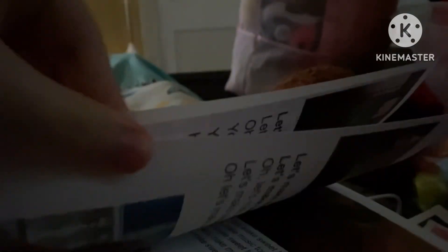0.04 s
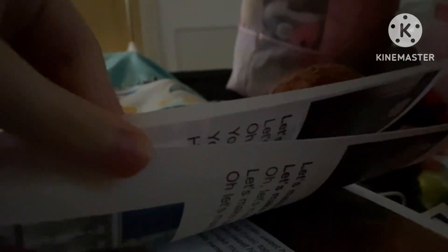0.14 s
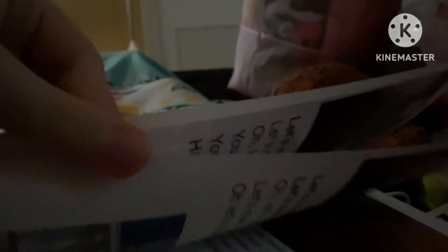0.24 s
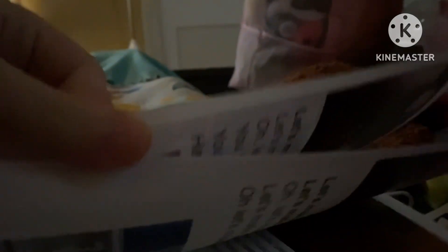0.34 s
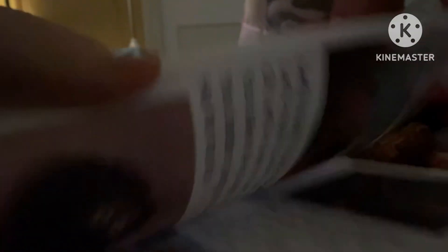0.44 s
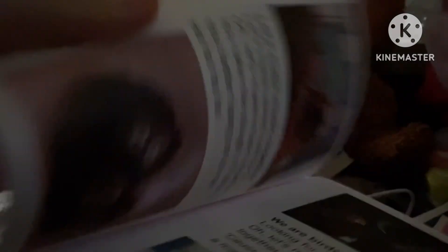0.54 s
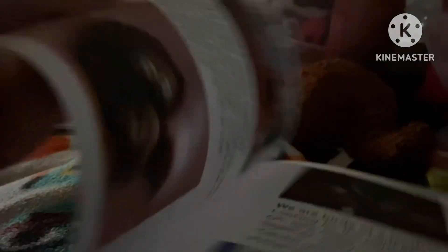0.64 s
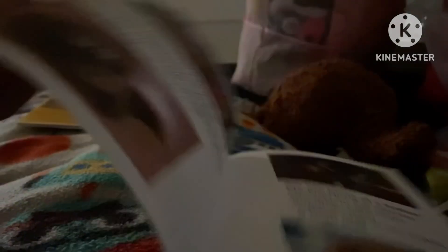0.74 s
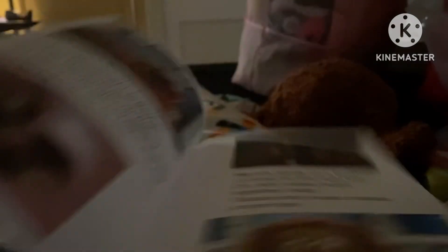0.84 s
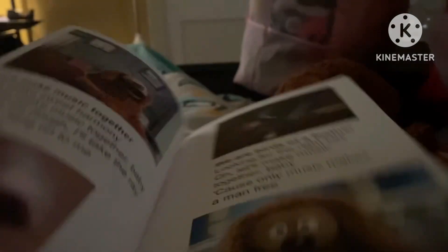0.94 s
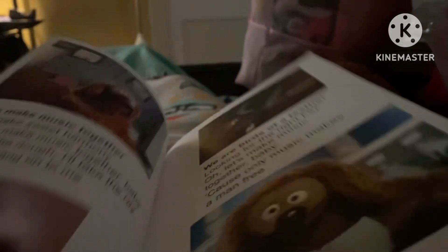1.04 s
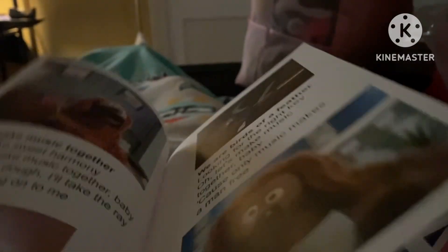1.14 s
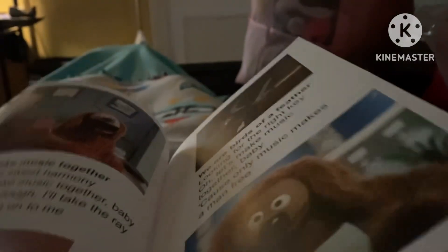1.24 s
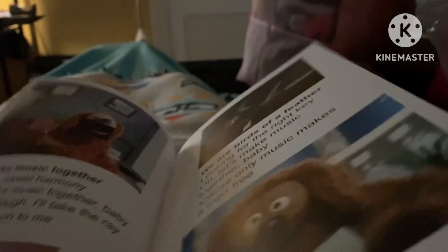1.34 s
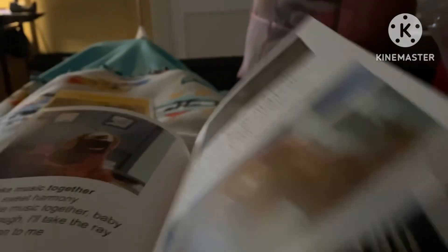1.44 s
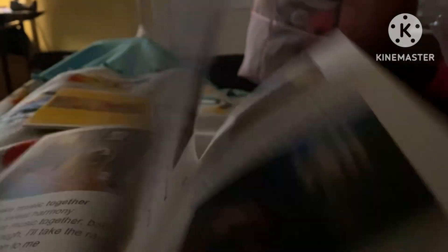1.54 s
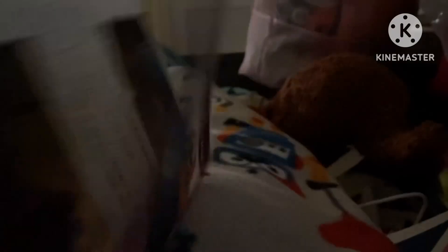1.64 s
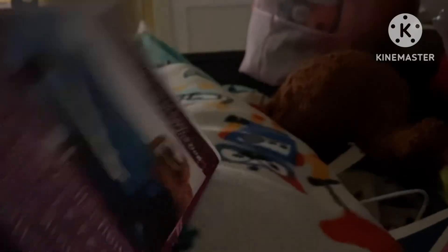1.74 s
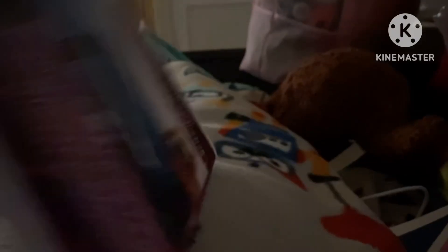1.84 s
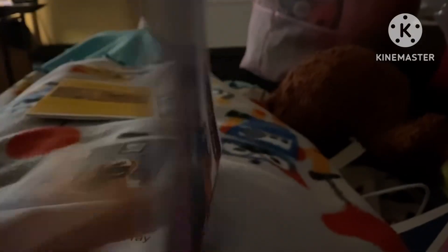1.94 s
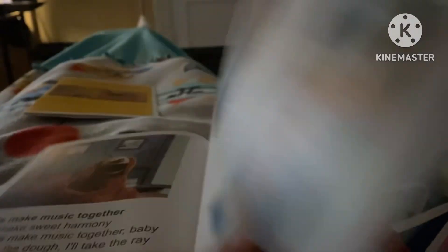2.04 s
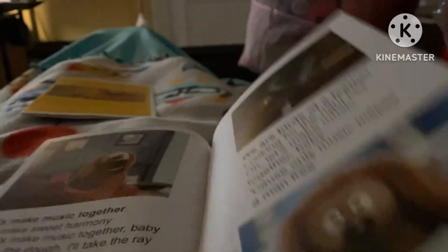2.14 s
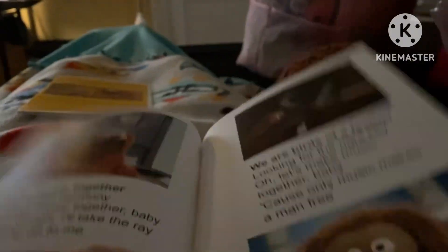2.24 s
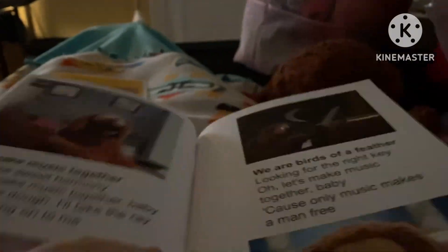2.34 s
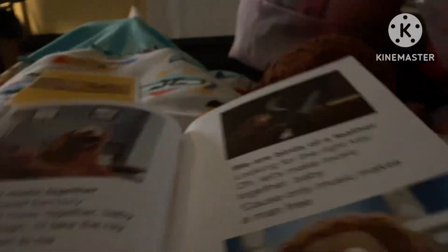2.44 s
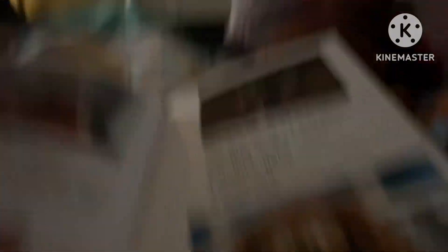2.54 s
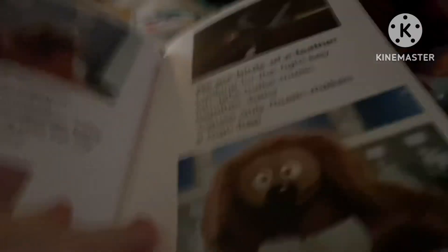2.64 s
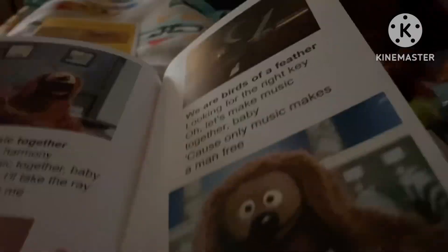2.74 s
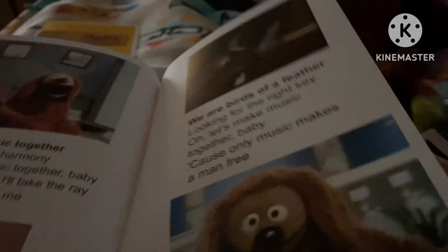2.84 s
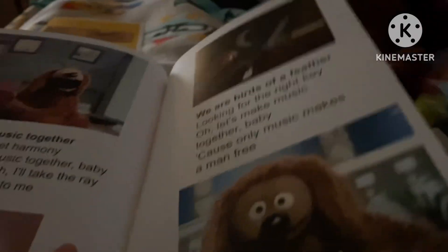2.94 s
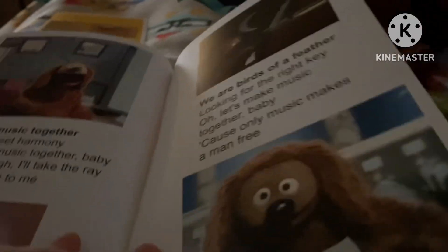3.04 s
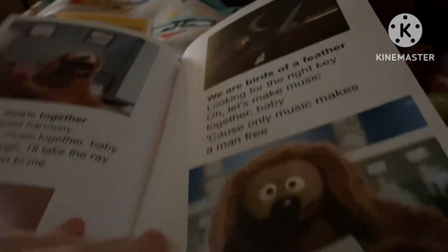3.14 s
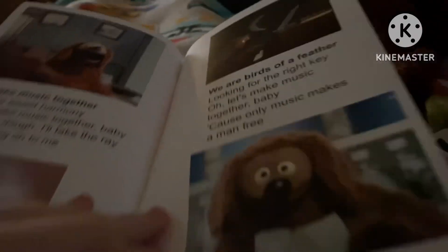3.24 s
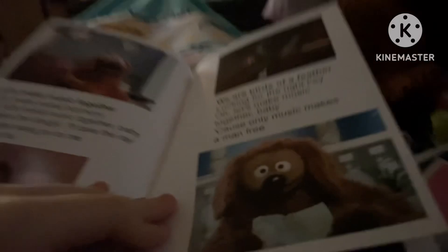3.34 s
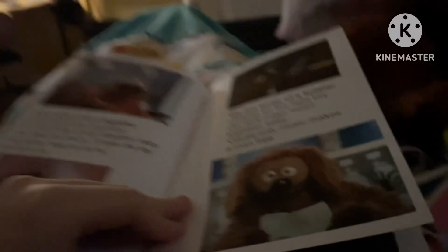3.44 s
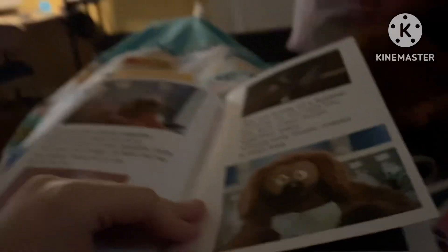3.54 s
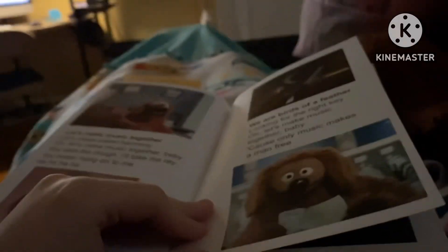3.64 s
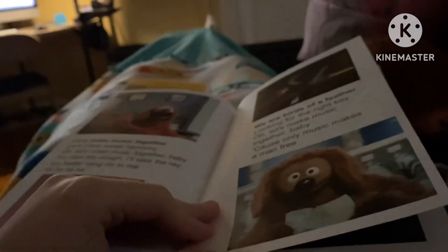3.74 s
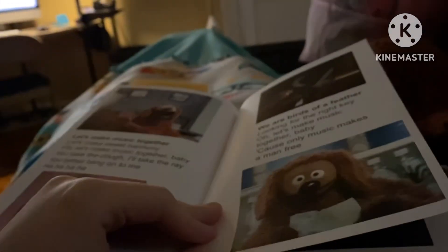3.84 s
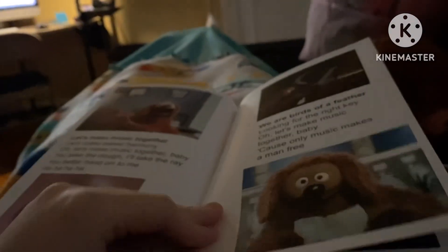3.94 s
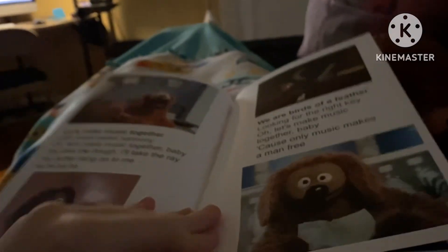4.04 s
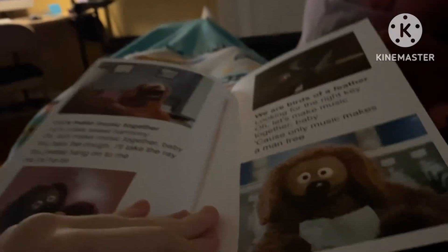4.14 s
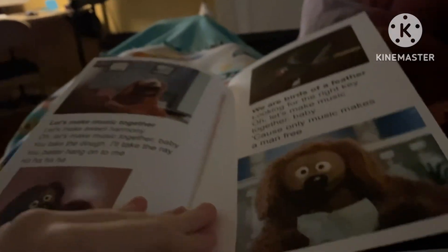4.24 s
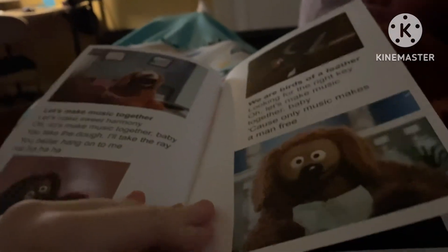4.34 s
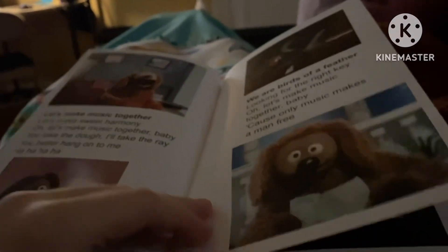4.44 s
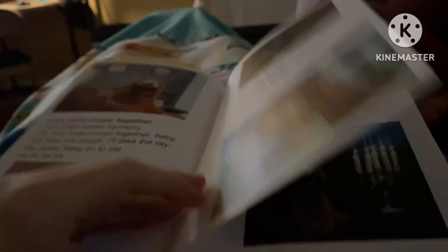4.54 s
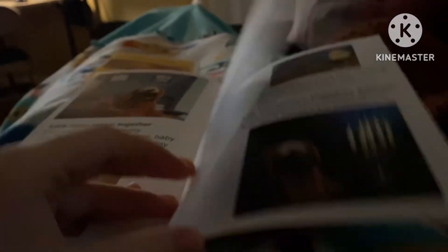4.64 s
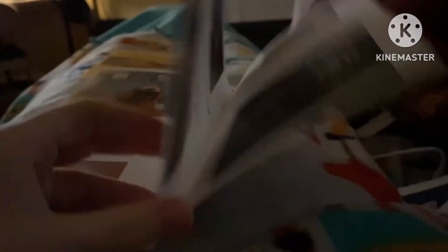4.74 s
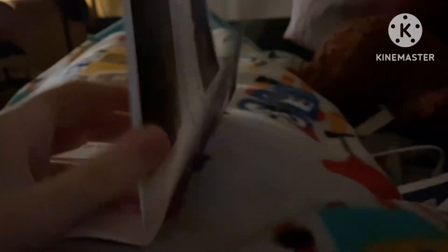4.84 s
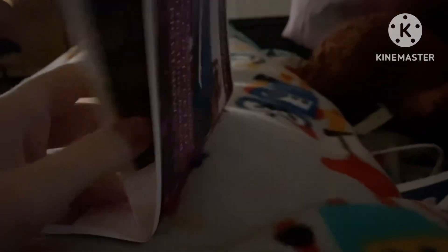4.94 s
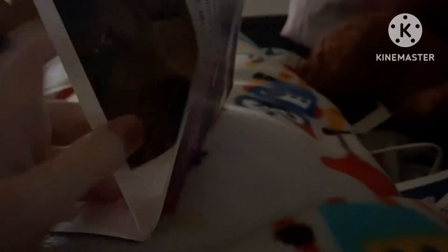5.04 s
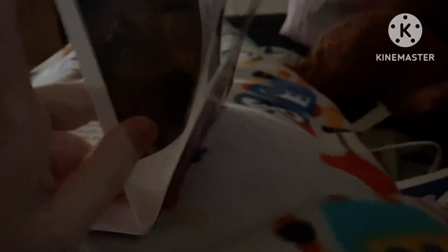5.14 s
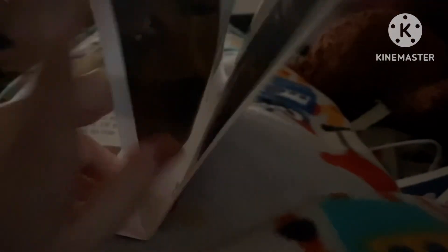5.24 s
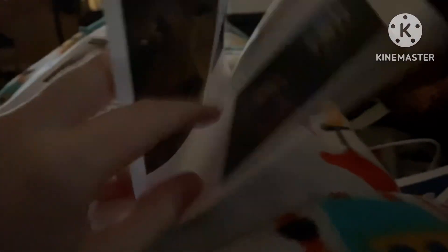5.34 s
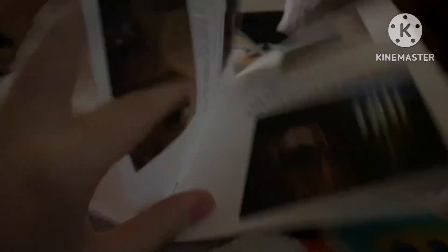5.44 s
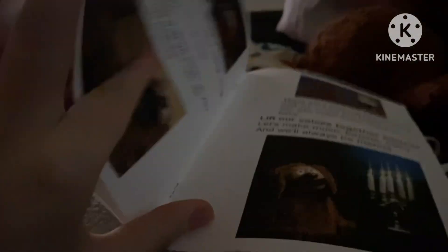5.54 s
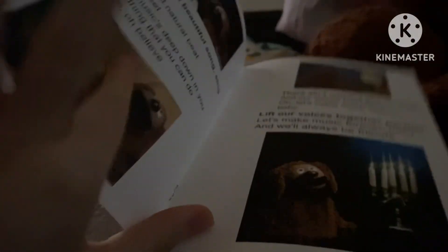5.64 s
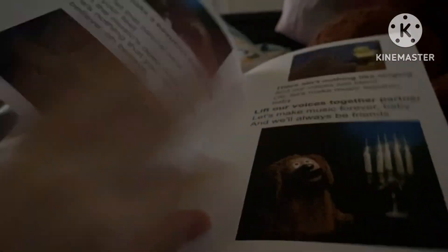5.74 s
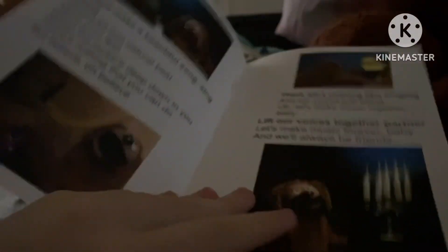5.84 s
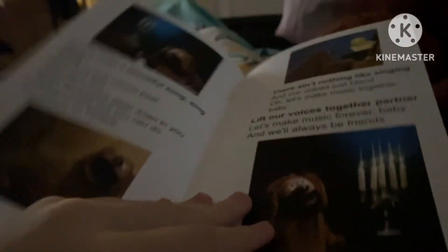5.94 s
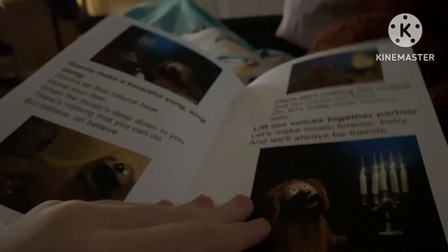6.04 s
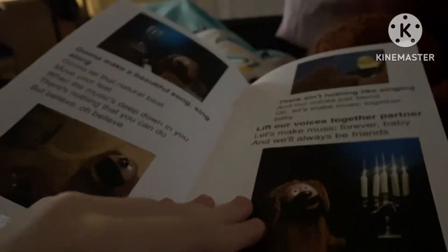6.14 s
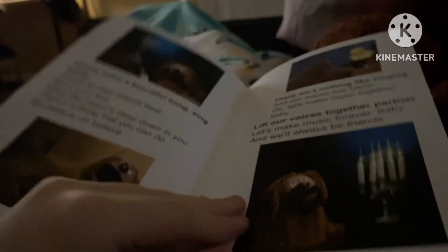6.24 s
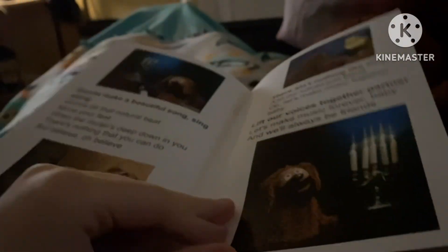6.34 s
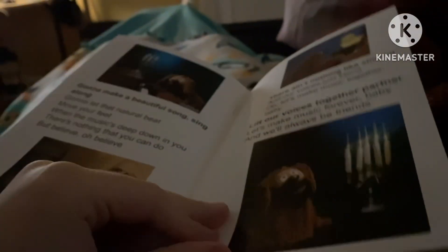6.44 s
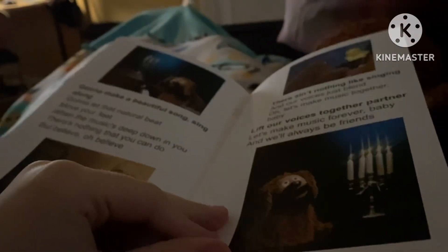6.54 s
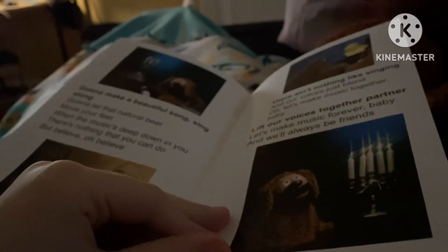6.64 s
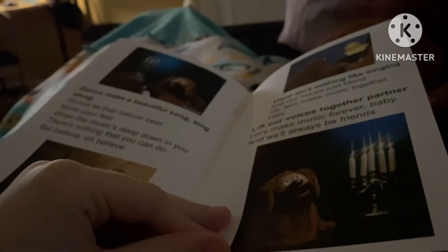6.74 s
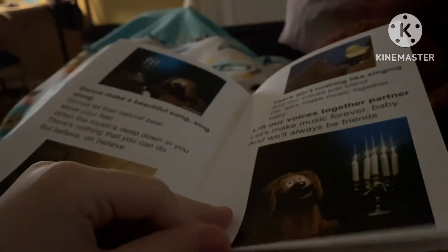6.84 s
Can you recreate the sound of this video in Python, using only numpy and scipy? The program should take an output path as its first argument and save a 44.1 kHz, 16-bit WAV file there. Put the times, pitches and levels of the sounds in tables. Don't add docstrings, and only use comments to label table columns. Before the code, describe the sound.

A thin glossy booklet is handled close to a small microphone in a soft, quiet bedroom, with a faint low appliance hum throughout. From 0 to 0.3 s fingers hiss over the paper, with a tiny chirp and dull buckles; at 0.4 s edges scrape off the thumb in a crisp burst. Light sliding fades toward 1.3 s. Small flicks at 1.65 lead to the loudest, sharp bright page snap at 1.76, then a rustling hiss and another crisp snap at 2.36. Soft rubbing thins out through 3 to 4 s. A light riffle ticks at 4.07, a small catch at 4.5, and a louder run of edges at 4.72. Rustles gather from 5.2, with a faint squeak at 5.47, dull fold knocks and dry crackles around 5.55, and a strong papery buckle at 5.82. Gentle sliding and faint nail ticks remain until almost 7 s, with a short dull room tail.

```python
import sys
import numpy as np
from scipy import signal
from scipy.fft import rfft, irfft
from scipy.io import wavfile
from scipy.ndimage import uniform_filter1d

SR = 44100
rng = np.random.default_rng(int(sys.argv[2]) if len(sys.argv) > 2 else 0)


def magnitude_from_level(level_db):
    exponent = np.asarray(level_db, float) / 20
    return 10 ** exponent


def log_audio(samples):
    frames = np.atleast_2d(samples).T
    limited = np.clip(frames, -1, 1)
    pcm = np.round(limited * 32767).astype(np.int16)
    wavfile.write(sys.argv[1], SR, pcm)


N = 303408

SLAP_RISE_DB_PER_S, SLAP_FALL_DB_PER_S = 3495, 279.5


def pages():
    stroke = hand_speed()
    push = crackle(185, 450, per_s=900.0, spread_db=3.5, clump_db=4.0, cycles=2.9)
    bends = crackle(482, 1130, per_s=2700.0, spread_db=-3.5, clump_db=-1.5, cycles=6.0)
    creases = crackle(1428, 2730, per_s=3000.0, spread_db=1.0, clump_db=2.0, cycles=16.0)
    tight = crackle(2490, 5030, per_s=8000.0, spread_db=4.0, clump_db=2.5, cycles=7.0)
    slide = sliding_skin()
    push = push + page_air()
    hiss = stroke * mottle(slide)
    jerks = rms_one(magnitude_from_level(2.5 * drift(130)))
    folds = sum(flexing(step, stroke) * fold for step, fold in ((1, bends), (2, creases), (3, tight)))
    return hiss + flexing(0, stroke) * push + jerks * folds


# t/s, hold/s, level/dB
STROKES = [(.005, 0.036, -43.5), (.2, 0.32, -50), (.46, 0.22, -47), (.74, 0.26, -55), (.97, 0.072, -56),
           (1.11, 0.15, -67), (1.365, 0.06, -51), (1.49, 0.19, -52.5), (1.8, 0.13, -41), (1.97, 0.36, -50),
           (2.13, 0.32, -47.5), (2.45, 0.12, -48), (2.635, 0.052, -49), (3.13, 0.3, -48),
           (3.99, 0.15, -55.5), (4.39, 0.042, -57), (4.56, 0.14, -55.5), (4.96, 0.02, -46),
           (5.13, 0.0082, -45.5), (5.2, 0.059, -51), (5.27, 0.23, -47.5), (5.59, 0.032, -46),
           (5.89, .17, -54), (6.13, 0.25, -60)]
# t/s, hold/s, level/dB
RESTS = [(2.763, 0.077, -65), (2.95, 0.063, -67.5), (3.095, 0.022, -54.5), (3.462, 0.039, -51.5),
         (3.947, .03, -68), (4.8, 0.15, -62), (5.042, .06, -66.5), (5.692, 0.059, -57.5),
         (6.43, 0.047, -60), (6.776, 0.03, -75), (6.853, .05, -66)]
# t/s, hold/s, level/dB
SKIDS = [(.093, 0.053, -49), (.412, 0.031, -52), (1.61, .015, -47.5), (1.627, .016, -48),
         (1.646, 0.004, -57), (1.667, 0.015, -61), (1.758, 0.0095, -28), (4.273, 0.064, -59),
         (4.514, 0.012, -50), (5.779, 0.071, -47), (6.644, 0.021, -75)]
# t/s, hold/s, level/dB
CATCHES = [
    (4.4935, 0.006, -38.5),
    (5.51, 0.043, -51),
]


def hand_speed():
    strokes = gestures(STROKES + RESTS, rise_db_per_s=481.5, fall_db_per_s=250)
    eased = uniform_filter1d(strokes, int(0.015 * SR))
    skids = gestures(SKIDS, SLAP_RISE_DB_PER_S, fall_db_per_s=544)
    catches = gestures(CATCHES, SLAP_RISE_DB_PER_S, fall_db_per_s=2500)
    return np.hypot(np.hypot(eased, skids), catches)


# f/Hz, level/dB per Hz
SLIDE = [(900, -26), (1500, -6.5), (2300, -2.5), (4000, 1), (5500, 2.5), (8400, 1), (15500, 0.5),
         (17000, 6.5)]


def sliding_skin():
    squeal = crackle(5655, 14640, per_s=16000.0, spread_db=-7.0, clump_db=-5.5, cycles=80.0, count=12)
    rub = coloured(SLIDE) + 0.14 * squeal
    grip_db = 0.5 * drift(31.0) + 0.82 * drift(330.0)
    return rub * magnitude_from_level(grip_db)


def page_air():
    puff_hz = 132
    band = signal.butter(2, [0.57 * puff_hz, puff_hz], "band", fs=SR, output="sos")
    return magnitude_from_level(-7.5) * rms_one(signal.sosfilt(band, rng.standard_normal(N)))


# t/s, hold/s, level/dB,
# tightness (0 whole page, 1 wide bend, 2 crease, 3 tight crease)
SLAPS = [(.002, 0.0074, -48, 0.63), (.207, 0.0061, -42.5, 0.34), (.222, 0.019, -46, 0.43),
         (.258, 0.015, -69, 0.63), (.408, 0.043, -35.5, 0.29), (.432, 0.032, -39, 1.3),
         (1.405, 0.014, -56.5, 0.38), (1.657, 0.019, -48.5, 2.7), (1.76, 0.015, -22.5, 4.7),
         (1.762, 0.011, -32, 0.19), (2.311, 0.023, -45, 1.6), (2.357, 0.0085, -36, 2.05),
         (2.372, 0.014, -58, 3.5), (4.075, 0.0064, -49.5, 2.9), (4.272, 0.011, -65.5, 5),
         (4.493, 0.03, -54.5, 2.1), (4.505, 0.044, -47, 0.8), (4.722, 0.014, -48.5, 0.55),
         (4.775, 0.029, -36, 7.3), (4.81, 0.049, -49, 6.3), (5.262, 0.034, -46.5, 1.2),
         (5.263, 0.039, -47.5, 4.4), (5.442, 0.031, -45.5, 2.1), (5.467, 0.062, -41.5, 1.2),
         (5.521, 0.032, -36, 1.64), (5.778, 0.031, -56, 0.83), (5.818, 0.036, -33, 1.14),
         (5.813, 0.038, -39, 0.74), (5.817, 0.021, -41.5, 2.9), (5.53, 0.1, -43, 5.2),
         (6.645, 0.0079, -57.5, 6.4)]
# t/s, hold/s, level/dB, tightness (as above)
RUSTLES = [(.07, 0.064, -54.5, 1.16), (.51, 0.039, -51.5, 0.14), (.56, 0.041, -40.5, 6.8),
           (.625, 0.015, -53, 3.9), (.97, 0.062, -63.5, 3.4), (1.12, 0.1, -64, 4.8),
           (1.905, 0.043, -50, 0.96), (2.22, 0.098, -56, 2), (2.44, 0.092, -56.5, 1),
           (2.525, 0.01, -48.5, 1.14), (2.635, 0.05, -51, 1.08), (3.63, 0.033, -68, 0.49),
           (4.96, 0.021, -49, 0.34), (5.135, 0.024, -62, 1.1), (5.335, 0.045, -48.5, 0.71),
           (5.385, 0.012, -51, 0.65), (5.585, 0.022, -39.5, 0.47), (5.62, 0.025, -36, 0.69),
           (5.67, 0.071, -57, 0.68), (5.97, 0.033, -59.5, 0.66), (6.025, 0.011, -61.5, 3.2),
           (6.3, 0.032, -67, 2.1)]
DRAG_DB = (-14, -17.5, -21, -22.5)


def flexing(step, stroke):
    looser_loss_db, tighter_loss_db = 1, 5
    faster = 1 + 0.16 * step
    power = (magnitude_from_level(DRAG_DB[step]) * stroke) ** 2
    sudden = (SLAPS, SLAP_RISE_DB_PER_S, SLAP_FALL_DB_PER_S)
    slow = (RUSTLES, 594, 330)
    for rows, rise, fall in (sudden, slow):
        here = []
        for s, hold_s, db, tight in rows:
            loss_db = tighter_loss_db if step > tight else looser_loss_db
            here.append((s, hold_s, db - loss_db * (step - tight) ** 2))
        power = power + gestures(here, rise, fall * faster) ** 2
    return np.sqrt(power)


def thicket(x):
    shape_s, t60_s, sheet_db = 0.1, 0.07, -3
    hop, t = int(shape_s * SR), np.arange(SR // 10) / SR
    out = np.zeros(N + 2 * SR)
    fade = np.sin(np.pi * np.arange(2 * hop) / (2 * hop))
    padded = np.pad(x, (hop, 2 * hop))
    for i in range(0, N + hop, hop):
        dull_noise = signal.lfilter([1], [1, -.5], rng.standard_normal(len(t)))
        modes = thin(dull_noise, 550) * magnitude_from_level(-60 * t / t60_s)
        rung = signal.fftconvolve(padded[i:i + 2 * hop] * fade, modes / np.sqrt(np.sum(modes ** 2)))
        out[i:i + len(rung)] += rung
    return (x + magnitude_from_level(sheet_db) * out[hop:hop + N]) / np.hypot(1, magnitude_from_level(sheet_db))


# t/s, peak level/dB, sheet ring f/Hz, edge over sheet
# level/dB
BUCKLES = [(.0058, -31, 750, -24), (.0304, -27, 680, -20), (.0439, -29, 640, -22), (.063, -35, 800, -24),
           (.109, -35, 560, -24), (.1414, -33, 720, -20), (.1661, -33, 620, -18), (.176, -37, 650, -20),
           (.1961, -36, 710, -8), (.2046, -29, 700, -14), (.2075, -27, 650, -22), (.2115, -30, 650, -22),
           (.2405, -24, 690, -14), (.258, -35, 800, -20), (.2745, -35, 700, -20), (.222, -35, 700, -14),
           (.4305, -22, 900, -18), (.4385, -23, 1100, -16), (.4485, -22, 350, -14), (.456, -25, 600, -10),
           (.4664, -22, 710, -14), (1.4045, -39, 600, -22), (1.6523, -21, 1790, -8),
           (1.6705, -27, 1870, -12), (1.775, -9, 2520, -10), (1.8136, -21, 2090, -10),
           (2.3144, -31, 1550, -20), (2.3178, -24, 800, -12), (2.3315, -28, 900, -10),
           (2.638, -36, 450, -18), (2.3645, -19, 880, -2), (2.374, -24, 800, -10), (2.3835, -24, 650, -10),
           (2.395, -28, 600, -12),
           (5.243, -38, 620, -24), (5.2525, -38, 650, -24), (5.267, -32, 600, -20),
                (5.332, -35, 680, -20), (5.338, -34, 590, -20), (5.414, -36, 700, -24),
                (5.4225, -36, 700, -24), (5.4435, -30, 1100, -14), (5.4545, -32, 2400, -14),
                (5.262, -33, 880, -12), (5.44, -30, 1150, -14), (5.4511, -29, 1150, -12),
                (5.5995, -26, 1660, -14), (5.612, -26, 1500, -14), (5.6205, -27, 800, -14),
                (5.8118, -27, 1270, -8), (5.815, -26, 600, -14), (5.821, -20, 760, -12),
                (5.853, -20, 760, -14), (5.866, -21, 770, -20), (5.874, -24, 760, -20),
                (5.8257, -17, 710, -17), (5.8383, -16, 710, -16), (5.8478, -17, 990, -21)]
# t/s, peak level/dB, sheet ring f/Hz, edge ring f/Hz
TICKS = [(.4445, -24, 2110, 3500), (.5623, -33, 3000, 4000), (.6372, -34, 3980, 5000),
         (1.6493, -22, 3830, 8300), (1.755, -17, 3850, 5300), (1.7573, -13, 710, 5300),
         (1.7636, -12, 2780, 4800), (1.7695, -11, 2200, 4800), (1.899, -36, 2000, 7000),
         (1.914, -32, 2600, 4600), (1.9064, -24, 860, 5200), (2.0896, -26, 5200, 8500),
         (2.325, -27, 900, 2800), (2.3655, -20, 3360, 3000), (2.391, -30, 3500, 6500),
         (2.3835, -31, 3400, 7000), (2.3566, -11, 880, 3300), (2.619, -41, 3000, 6500),
         (3.9522, -49, 710, 5400), (4.2738, -43, 990, 8800), (4.4945, -26, 2300, 5900),
         (4.4984, -29, 2260, 5200), (5.7765, -38, 2000, 6000), (6.0282, -42, 1830, 4800),
         (6.0414, -42, 1810, 7000), (.196, -37, 3000, 6500), (.2418, -32, 3000, 6500),
         (.2065, -36, 3600, 7200), (2.3575, -17, 3300, 3600), (2.366, -28, 3400, 7000)]


def snaps():
    glide_s, glide = 0.0008, 1.8
    out, t = np.zeros(N + 900), np.arange(900) / SR
    rows = [(s, db, hz, 2900, edge_db) for s, db, hz, edge_db in BUCKLES]
    rows += [(*row, -2) for row in TICKS]
    tears = rng.standard_normal((len(rows), 900))
    for (s, peak_db, sheet_hz, edge_hz, edge_db), tear in zip(rows, tears):
        low = sheet_hz < 1200
        push = .3 * tear * np.exp(-t / .0012) + (t == 0)
        sheet = ring(push, sheet_hz, 9.0 / sheet_hz)
        sheet = rms_one(ring(sheet, 2.2 * sheet_hz, 0.85 / sheet_hz))
        if low:
            turns = sheet_hz * (t + glide * glide_s * (1 - np.exp(-t / glide_s)))
            swell = sheet_hz * t / .85
            bend = np.sin(2 * np.pi * turns + tear[0]) * swell * np.exp(-swell)
            sheet = .5 * sheet + rms_one(bend)
        edge = rms_one(thin(ring(push, edge_hz, 6.0 / edge_hz), .6 * edge_hz))
        snap = thin(sheet + magnitude_from_level(edge_db + 2) * edge, 210)
        i = round(s * SR)
        out[i:i + 900] += magnitude_from_level(peak_db - 1.5 - 2.5 * low) * snap / np.max(np.abs(snap))
    return out[:N]


# t/s, peak level/dB
SCRAPE = [(.3982, -16), (.4022, -7), (.4096, -8.5), (.4165, -21), (.4195, -24), (.4220, -17), (.4258, -24),
          (.4290, -19), (.4325, -23), (.4355, -20), (.439, -23), (.4422, -21), (.4447, -23), (.4470, -22)]
# f/Hz, level/dB, t60/s
SCRAPE_MODES = [(3720, -4.5, 0.0057), (4970, -3.5, 0.0052), (7240, -1.5, 0.0071), (8440, -1, 0.0027),
                (10800, 3, 0.0002), (12500, -3, 0.0077), (15050, -4, 0.00025)]


def scrape():
    return riffle(SCRAPE, SCRAPE_MODES, 0.0005, 1500)


# t/s, peak level/dB
SQUEAK = [
    (5.4665, -30.5),
    (5.4700, -50),
    (5.4765, -40),
    (5.4850, -45),
    (5.4910, -33),
    (5.4985, -38.5),
    (5.5020, -48),
    (5.5090, -49),
]
# f/Hz, level/dB, t60/s
SQUEAK_MODES = [(2590, -6, 0.078), (1990, -11, 0.0059)]


def squeak():
    return riffle(SQUEAK, SQUEAK_MODES, 0.00079, 1200)


# t/s, peak level/dB
RIFFLE_A = [(4.0724, -18.5), (4.0752, -35), (4.0819, -26), (4.0893, -46), (4.0910, -26), (4.0928, -37),
            (4.0987, -31), (4.1010, -32), (4.1048, -33), (4.1080, -34), (4.1102, -42), (4.1145, -39)]
# f/Hz, level/dB, t60/s
RIFFLE_A_MODES = [(2040, -3, 0.0046), (4420, -6, 0.0026), (6270, -7.5, 0.0018), (13500, -16.5, 0.00075)]
# t/s, peak level/dB
RIFFLE_B = [(4.7214, -9), (4.7341, -9), (4.7394, -22), (4.7413, -22), (4.7474, -23), (4.7522, -24),
            (4.7541, -20), (4.7573, -29), (4.7589, -29), (4.7603, -22), (4.7664, -24), (4.7680, -31),
            (4.7701, -28), (4.7716, -27)]
# f/Hz, level/dB, t60/s
RIFFLE_B_MODES = [(720, -18, .01), (2520, 1, .0045), (5500, -1, .0016), (8000, -8, .0012),
                  (11500, -21, .001)]


def thumb_riffles():
    return riffle(RIFFLE_A, RIFFLE_A_MODES, 0, 1100) + riffle(RIFFLE_B, RIFFLE_B_MODES, 0, 880)


# t/s, peak level/dB
CHIRP = [
    (.0912, -30),
    (.0942, -30),
    (.1015, -32),
    (.1045, -35),
    (.109, -40),
]
# f/Hz, level/dB, t60/s
CHIRP_MODES = [(6500, -2, 0.0037), (4040, -1.5, 0.0032), (8000, -3, 0.0028), (13200, -1, 0.00079),
               (2880, -7, 0.0047), (1700, -6, .006)]


def fingertip_chirp():
    return riffle(CHIRP, CHIRP_MODES, 0.0008, 1500)


# t/s, peak level/dB
FLICK = [(1.6255, -36), (1.629, -33), (1.6335, -34), (1.639, -34), (1.6445, -31), (1.6475, -23),
         (1.6488, -20), (1.6655, -33), (1.6685, -30), (1.675, -32), (1.6812, -32), (1.6862, -34)]
# f/Hz, level/dB, t60/s
FLICK_MODES = [(4480, 1.5, 0.0036), (6430, 0.5, .002), (8400, 3.5, 0.00082), (11900, -9.5, .0015),
               (14300, -6.5, .0015)]


def corner_flick():
    return riffle(FLICK, FLICK_MODES, 0.0008, 2000)


# t/s, hold/s, level/dB, f/Hz
SLOTS = [(0.558, 0.013, -54, 2750), (1.624, .015, -55.5, 1870), (1.651, 0.017, -45.5, 1790),
         (1.657, 0.012, -60.5, 4400), (1.773, 0.022, -34.5, 2260), (1.775, 0.02, -37.5, 5900),
         (1.82, 0.1, -50, 2550), (2.363, 0.016, -53.5, 3480), (4.496, 0.029, -46.5, 2170),
         (5.254, 0.027, -52, 2850), (5.33, 0.027, -51.5, 2700), (5.327, 0.027, -57.5, 5240),
         (5.767, .015, -61.5, 1970), (6.012, 0.021, -56.5, 1900)]


def slots():
    friction = rng.standard_normal(N)
    out = np.zeros(N)
    for *row, hz in SLOTS:
        tone = rms_one(ring(ring(friction, hz, 7.7 / hz), hz, 20 / hz))
        out += gestures([row], SLAP_RISE_DB_PER_S, SLAP_FALL_DB_PER_S) * tone
    return out


# t/s, peak level/dB
KNOCKS = [(5.5215, -25), (5.5262, -27), (5.5303, -20), (5.5338, -17), (5.5412, -17), (5.5445, -26),
          (5.553, -24), (5.5605, -25), (5.5650, -22), (5.5668, -22), (5.575, -30), (5.585, -30),
          (5.8385, -22), (5.8468, -22), (5.854, -28), (5.871, -32)]
# f/Hz, level/dB, t60/s
KNOCK_MODES = [(1070, 3, 0.0032), (1980, 4, 0.004), (3000, 3.5, 0.004), (4840, -0.5, 0.0033),
               (5900, -20, .003)]


def knocks():
    return riffle(KNOCKS, KNOCK_MODES, 0.00023, 550)


# t/s, peak level/dB
CRACKS = [(2.2665, -36), (2.2715, -40), (2.2785, -35), (5.298, -38), (5.5935, -37), (5.5985, -27),
          (5.6002, -33), (5.6055, -38), (5.6102, -27), (5.6122, -32), (5.616, -37), (5.6305, -38),
          (5.8012, -30), (5.8118, -28), (5.8186, -27), (5.8254, -26), (5.907, -43)]
# f/Hz, level/dB, t60/s
CRACK_MODES = [(2500, 5.5, 0.0023), (4500, -3, 0.002), (7300, 2.5, 0.00086), (10400, -2, .0008),
               (14800, -10, 0.00071)]


def coating_cracks():
    return riffle(CRACKS, CRACK_MODES, 0, 1150)


# t/s, peak level/dB
NAIL = [
    (6.0282, -42),
    (6.0414, -43),
    (6.6424, -35),
    (6.661, -53),
    (6.666, -51),
    (6.6715, -52),
    (6.677, -51),
    (6.682, -55),
    (6.773, -56),
    (6.785, -56),
]
# f/Hz, level/dB, t60/s
NAIL_MODES = [(1474, -1.5, 0.0051), (2700, -6, 0.0034), (5300, -8, 0.0035), (8430, -3, .005),
              (12800, -4, 0.0035)]


def nail_on_edge():
    return riffle(NAIL, NAIL_MODES, 0.00028, 1090)


def riffle(slips, modes, scrape_s, bass_cut_hz):
    out, t = np.zeros(N + 900), np.arange(900) / SR
    for s, peak_db in slips:
        push = 1. * (t == 0)
        if scrape_s > 1e-4:
            push = rng.standard_normal(900) * t / scrape_s * np.exp(-t / scrape_s)
        strengths_db = rng.normal(0, 1.5, len(modes))
        slip = np.zeros(900)
        for k, ((hz, db, t60), change_db) in enumerate(zip(modes, strengths_db)):
            mode = rms_one(ring(ring(push, hz, 0.42 * t60), hz, t60))
            slip += magnitude_from_level(db + change_db) * (-1) ** k * mode
        slip = thin(slip, bass_cut_hz)
        i = round(s * SR)
        out[i:i + 900] += magnitude_from_level(peak_db) * slip / np.max(np.abs(slip))
    return out[:N]


def crackle(low_hz, high_hz, per_s, spread_db, clump_db, cycles, count=8):
    sizes = magnitude_from_level(spread_db * np.minimum(rng.exponential(1, N), 4)) * rng.choice([-1, 1], N)
    born = rng.random(N) < per_s / SR
    clicks = sizes * born * magnitude_from_level(clump_db * drift(60.0))
    dealt = rng.integers(0, count, N)
    patches = np.geomspace(low_hz, high_hz, count)
    out = sum(ring(clicks * (dealt == k), hz, cycles / hz) for k, hz in enumerate(patches))
    band = signal.butter(2, [.85 * low_hz, 1.2 * high_hz], "band", fs=SR, output="sos")
    out = signal.sosfilt(band, out)
    return out / np.sqrt(np.abs(uniform_filter1d(out ** 2, size=4000)) + 1e-9)


def gestures(rows, rise_db_per_s, fall_db_per_s):
    s, hold_s, level_db = np.array(rows).T[:, :, None]
    t = np.arange(0, N, 32) / SR
    before_s = np.maximum(s - t, 0)
    after_s = np.maximum(t - s - hold_s, 0)
    under_db = rise_db_per_s * before_s + fall_db_per_s * after_s
    gain = np.sqrt(np.sum(magnitude_from_level(level_db - under_db) ** 2, axis=0))
    return np.interp(np.arange(N) / SR, t, gain)


def mottle(x):
    lows = [0] + [x - thin(x, hz) for hz in (3500, 5500, 8000, 11500)] + [x]
    return sum((high - low) * magnitude_from_level(1.5 * drift(7.0)) for low, high in zip(lows, lows[1:]))


def thin(x, hz):
    return signal.sosfilt(signal.butter(2, hz, "high", fs=SR, output="sos"), x)


def ring(x, hz, t60):
    r, w = magnitude_from_level(-60 / (t60 * SR)), 2 * np.pi * min(hz, SR / 2.2) / SR
    return signal.lfilter([0, np.sin(w)], [1, -2 * r * np.cos(w), r * r], x + 1e-18)


def coloured(points):
    hz = np.arange(N // 2 + 1) * SR / N + 1
    point_hz, point_db = np.array(points).T
    shape_db = np.interp(np.log(hz), np.log(point_hz), point_db)
    return rms_one(irfft(rfft(rng.standard_normal(N)) * magnitude_from_level(shape_db), N))


def drift(rate):
    r = np.exp(-2 * np.pi * rate / SR)
    return rms_one(signal.lfilter([1], [1, -2 * r, r * r], rng.standard_normal(N + SR))[SR:])


def rms_one(x):
    return x / np.sqrt(np.mean(x ** 2) + 1e-20)


def bedroom(x):
    t = np.arange(SR // 3) / SR
    tail = rng.standard_normal(len(t)) * magnitude_from_level(-60 * t / 0.2) * (t > .009)
    tail = thin(signal.lfilter([.4], [1, -.6], tail), 280)
    return magnitude_from_level(-16) * signal.fftconvolve(x, tail / np.sqrt(np.sum(tail ** 2)))[:N]


# f/Hz, level/dB per Hz
ROOM_AIR = [(15, -66.5), (25, -49.5), (134, -1.5), (170, -10), (223, -10), (363, -20), (405, -13.5),
            (463, -26.5), (545, -20.5), (1130, -32), (16000, -48)]
# f/Hz, width/Hz, level/dB rms
HUM = [(134.8, 5.6, -58.5), (134.6, 24, -61.5), (190, 11, -65.5), (229.3, 13, -63.5), (402.8, 7.8, -62.5),
       (402, 58, -67)]


def hum():
    out = magnitude_from_level(-55 + 0.43 * drift(2.3)) * coloured(ROOM_AIR)
    for hz, width_hz, level_db in HUM:
        once = ring(rng.standard_normal(N), hz, 1.4 / width_hz)
        twice = rms_one(ring(once, hz, 1.04 / width_hz))
        wavering = uniform_filter1d(twice ** 2, int(3 * SR / hz)) + .1
        steadied = twice / wavering ** 0.25
        out = out + magnitude_from_level(level_db + 0.47 * drift(3.2)) * rms_one(steadied)
    return out


def scene():
    runs = scrape() + squeak() + thumb_riffles() + fingertip_chirp() + corner_flick()
    booklet = thicket(pages()) + snaps() + runs + slots()
    booklet += knocks() + coating_cracks()
    booklet += nail_on_edge()
    return (booklet + bedroom(booklet) + hum())[None, :]


def roll_off(x):
    return signal.sosfilt(signal.butter(12, 17160, fs=SR, output="sos"), x)


def record(dry):
    top_cut = signal.ellip(8, .5, 35, 15800, fs=SR, output="sos")
    mix = signal.sosfilt(top_cut, dry)
    return roll_off(mix)


dry = scene()
out = record(dry)
log_audio(out)
```